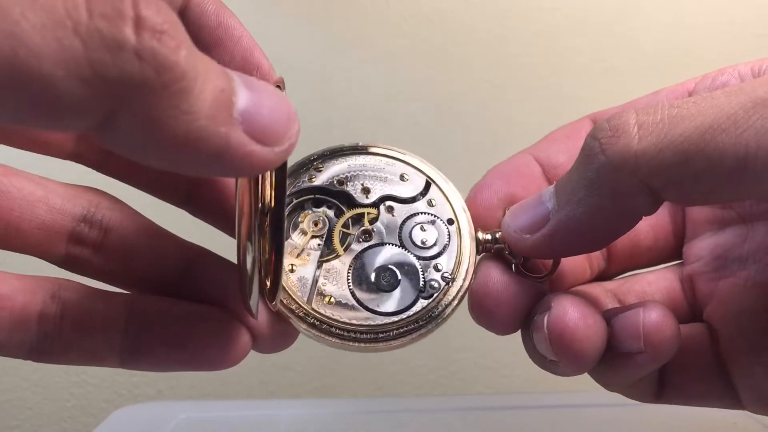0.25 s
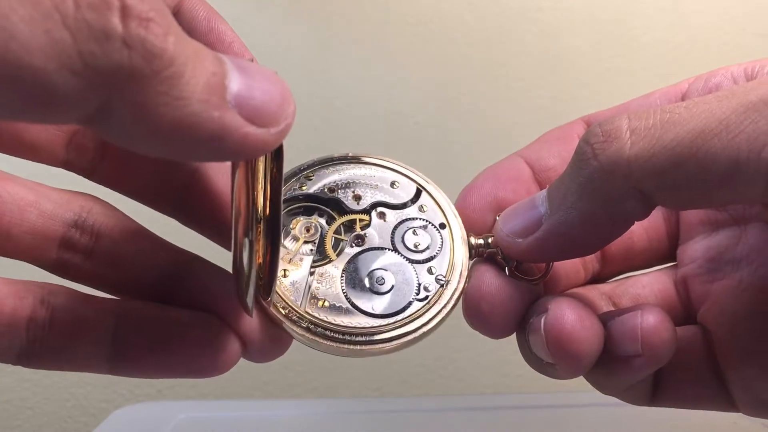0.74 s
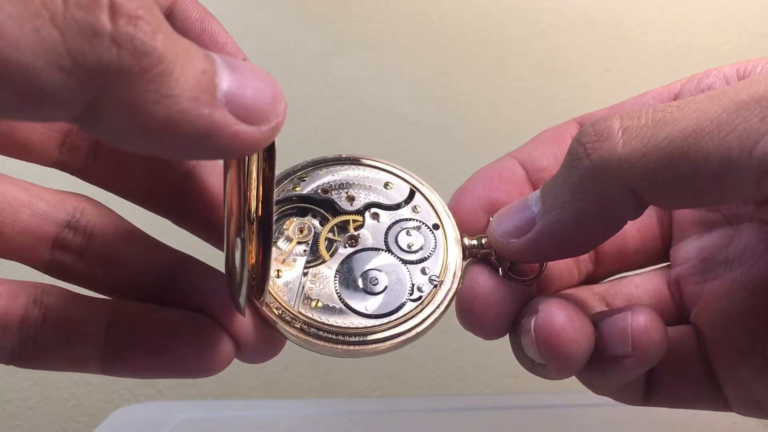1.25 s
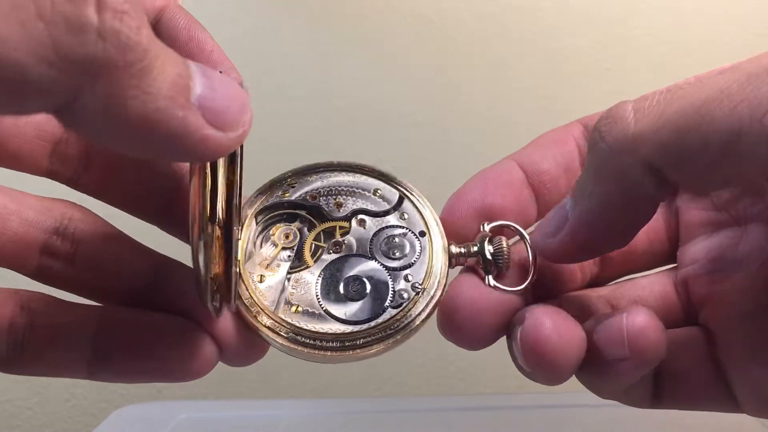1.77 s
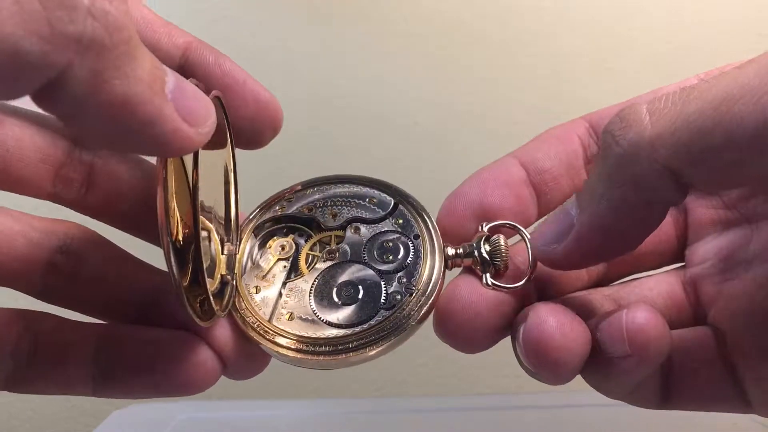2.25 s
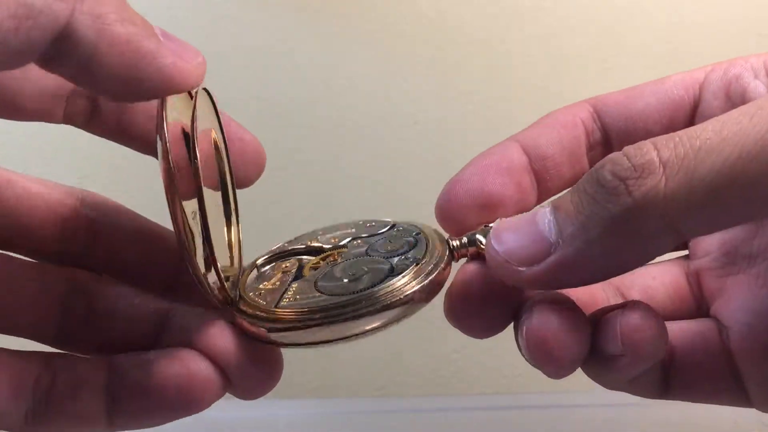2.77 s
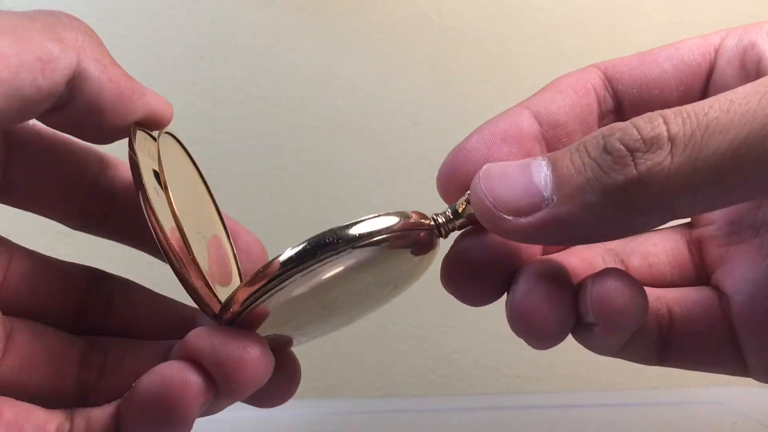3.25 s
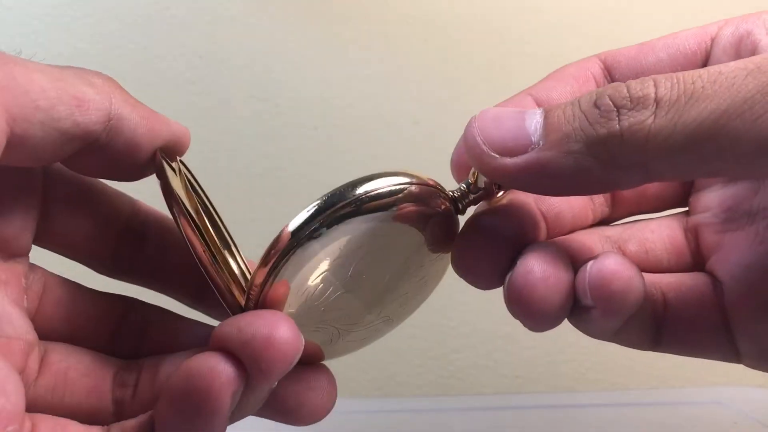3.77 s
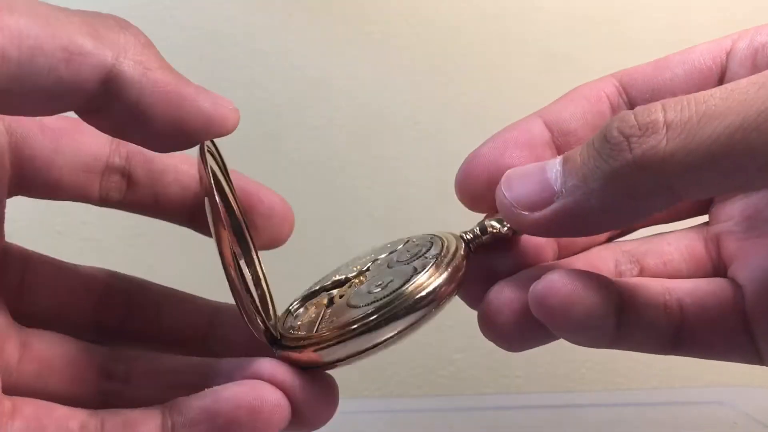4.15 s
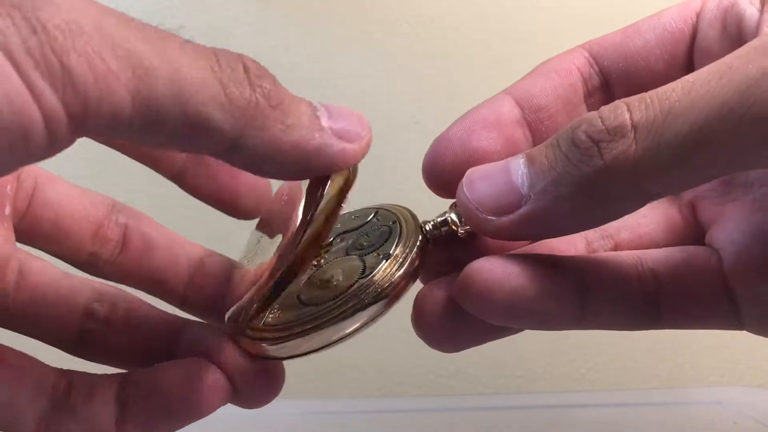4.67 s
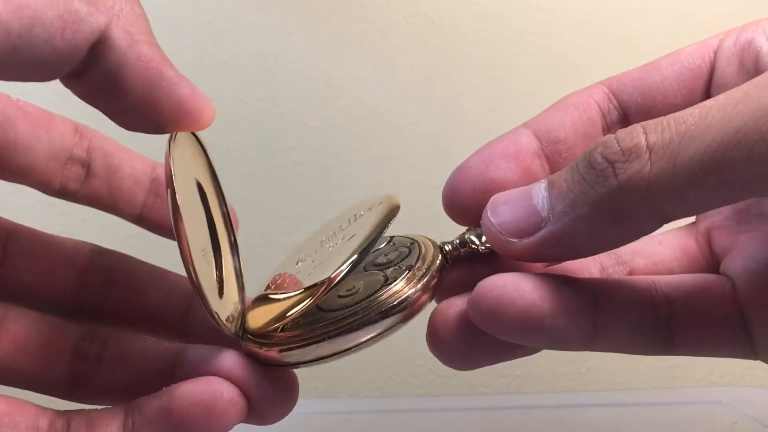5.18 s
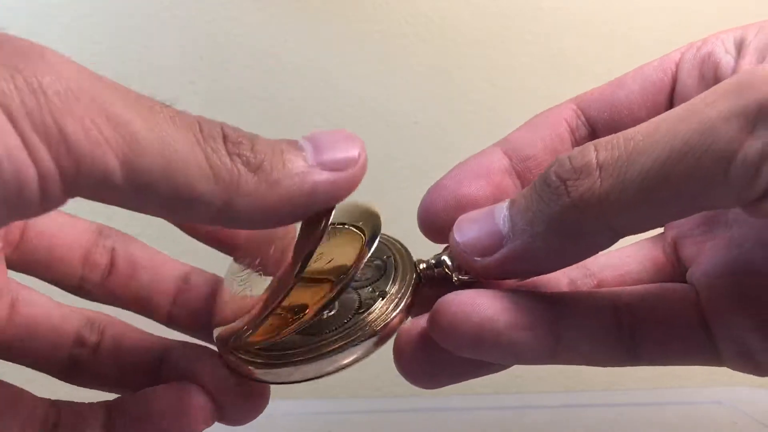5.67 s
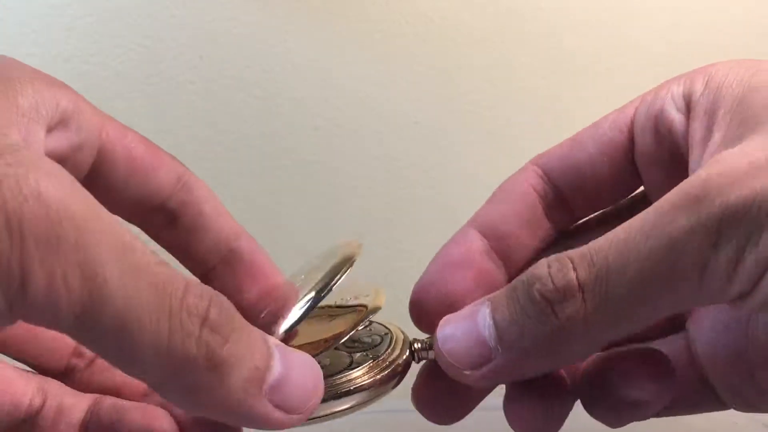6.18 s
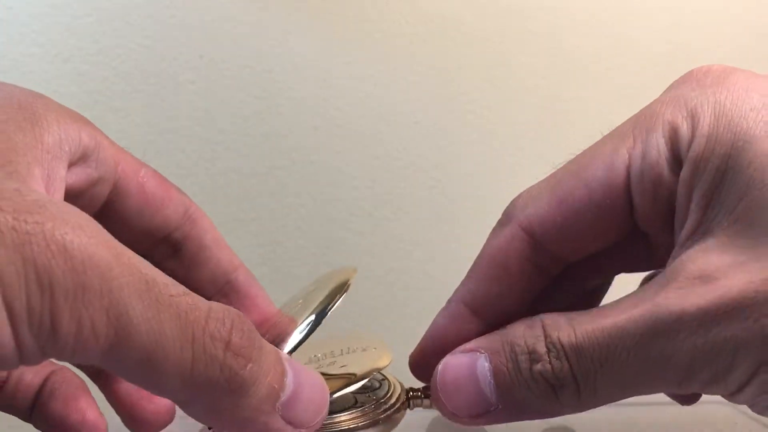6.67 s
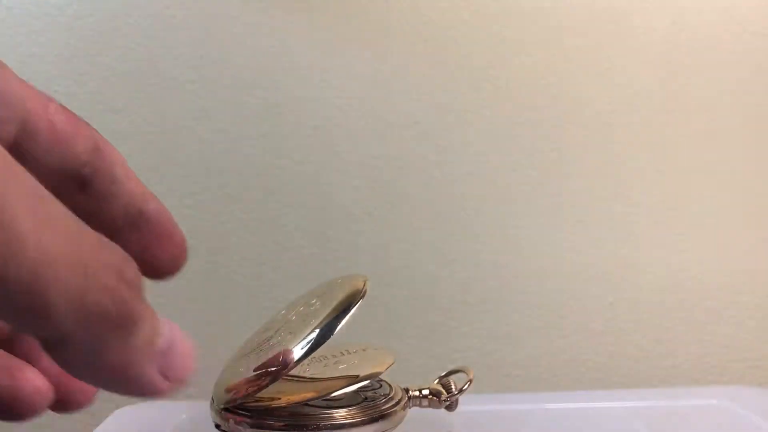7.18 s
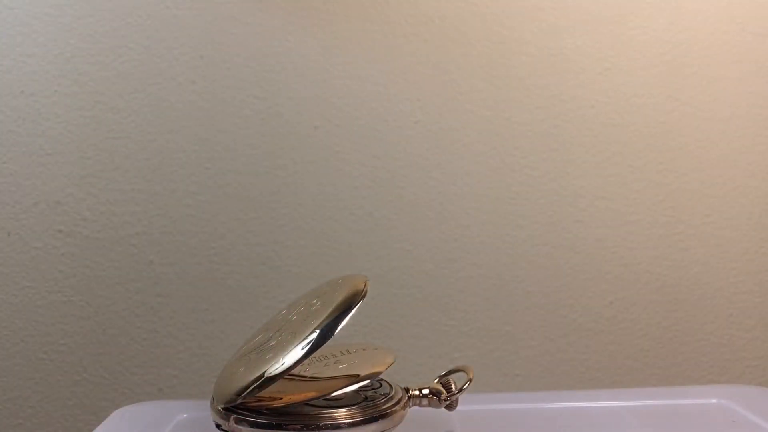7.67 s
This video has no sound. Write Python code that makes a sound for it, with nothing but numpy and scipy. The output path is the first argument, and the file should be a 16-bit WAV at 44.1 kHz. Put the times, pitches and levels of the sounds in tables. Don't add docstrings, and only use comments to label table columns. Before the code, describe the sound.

An open mechanical pocket watch ticks steadily, about five crisp high beats a second, close to a phone microphone in a small quiet room. Faint air-conditioning rumble and thin lamp buzz lie underneath. Light nail clicks come first, then a sharp metallic lid snap midway. Later hands thud and rub on a hollow plastic box, the watch lands with a loud boomy knock, and a cover drops with a small double clink.

```python
import sys
import numpy as np
from scipy import signal
from scipy.fft import rfft, irfft, next_fast_len
from scipy.io import wavfile

SR = 44100
rng = np.random.default_rng(int(sys.argv[2]) if len(sys.argv) > 2 else 0)


def pcm_store(signal):
    levels = np.round(np.clip(np.atleast_2d(signal), -1, 1) * 32767)
    wavfile.write(sys.argv[1], SR, levels.astype(np.int16).T)


def convert_level_to_amplitude(level_db):
    exponent = np.asarray(level_db, float) / 20
    return 10 ** exponent


N = 349713
SHORT, LONG = 3072, 16384


def at(s, rows):
    return np.interp(s, *np.transpose(rows))


def columns(rows):
    s, *values = np.transpose(rows)
    return [np.interp(np.arange(N) / SR, s, v) for v in values]


def rms_one(x):
    return x / np.sqrt(np.mean(x ** 2) + 1e-20)


def band(x, low_hz, high_hz):
    return signal.sosfilt(signal.butter(2, [low_hz, high_hz], "band", fs=SR, output="sos"), x)


def coloured(x, spectrum, peaks=()):
    size = next_fast_len(2 * len(x), True)
    hz = np.maximum(np.fft.rfftfreq(size, 1 / SR), 1)
    points = np.array(spectrum)
    level_db = np.interp(np.log(hz), np.log(points[:, 0]), points[:, 1])
    for centre_hz, width_hz, boost_db in peaks:
        level_db = level_db + boost_db / (1 + (2 * (hz - centre_hz) / width_hz) ** 2)
    cepstrum = irfft(np.log(convert_level_to_amplitude(level_db)), size)
    cepstrum[1:size // 2] *= 2
    cepstrum[size // 2 + 1:] = 0
    return irfft(rfft(x, size) * np.exp(rfft(cepstrum)), size)[:len(x)]


def ring(force, modes, spread_db=0):
    out = 0
    for hz, level_db, t60 in modes:
        r = convert_level_to_amplitude(-60 / (t60 * SR))
        w = 2 * np.pi * hz / SR
        gain = convert_level_to_amplitude(level_db + spread_db * rng.standard_normal())
        out = out + gain * signal.lfilter([0, np.sin(w)], [1, -2 * r * np.cos(w), r * r], force)
    return out


def burst(t60, rise_s=0.00019, size=SHORT):
    t = np.arange(size) / SR
    envelope = convert_level_to_amplitude(-60 * t / t60) * (1 - np.exp(-t / rise_s))
    return rng.standard_normal(size) * (envelope + 1e-18)


def soft_push():
    return signal.sosfilt(signal.butter(2, 600, fs=SR, output="sos"), signal.unit_impulse(LONG))


def rattle(rattle_ms):
    t = np.arange(LONG) / SR
    grains = rng.standard_normal(LONG) * rng.exponential(1, LONG) ** .5
    rise = np.clip(t / 0.00038, 0, 1)
    return grains * rise * np.clip((rattle_ms / 1000 - t) / 0.0023, 1e-18, 1)


def add(out, s, sound, peak_db):
    i = max(round(s * SR), 0)
    piece = sound[:N - i]
    out[i:i + len(piece)] += piece * convert_level_to_amplitude(peak_db) / np.max(np.abs(sound))


# frequency in Hz, level in dB, T60 in seconds.
CASE_RING = [(5900, -11, .015), (6600, -6, .015), (7080, 0, .03)]
PLATE_RING = [(8570, 15, 0.046), (8140, 21, 0.03), (9070, 9, 0.066), (9590, 6, 0.054), (9700, -19, 0.011)]
WHEEL_RING = [(12000, -6.5, 0.0071), (12100, 7, 0.017), (12150, 14, 0.024), (11970, 9, 0.025),
              (12550, -6, 0.022), (14670, 9, 0.014), (13900, -9, 0.015), (16000, -20, .012),
              (14940, -14, .012)]
UNLOCK_RING = [(3800, -9, 0.02), (4250, -9.5, 0.015), (8330, -3.5, 0.016), (9100, -5, 0.0068),
               (12960, -9, 0.0067), (13750, -9, 0.0087), (15400, -9, 0.0074)]
BRIDGE_RING = [(3620, -7, 0.1), (4180, 1, 0.09)]
# time in seconds, lead in seconds.
UNLOCK_LEAD = [(0, .0210), (4, .0205), (6.5, .0195), (7.9, .0180)]
# time in seconds, lateness in seconds.
LATENESS = [(0, 0), (1.7, -.0003), (2.0, -.0019), (2.8, -.001), (4.1, -.0013), (4.5, 0), (5.4, -.0014),
            (6.4, -.0013), (6.9, -.0005), (7.3, .0025), (7.9, .0035)]
# time in seconds, peak of the drop in dB.
FACING = [(0, -40.5), (.63, -40.5), (.83, -40), (1.5, -40.5), (2.3, -41), (2.85, -43), (3.4, -46),
          (3.63, -50), (3.83, -44.5), (4.03, -40), (4.23, -43), (4.85, -39.5), (5.03, -44.5), (5.45, -42),
          (5.83, -44.5), (6.2, -49), (6.65, -46), (7.9, -49)]
# time in seconds, case ring in dB.
CASE_LEVEL = [(0, -61), (1.7, -76), (2.2, -77), (2.7, -63), (4.3, -82), (5.3, -70), (5.7, -59.5),
              (7.0, -58), (7.5, -51), (7.9, -52.5)]
FIRST_BEAT_S, SWING_S, TOCK_AFTER_S, SWINGS = .0358, .3996, .1956, 20
STRIKE_SPREAD_DB, RING_SPREAD_DB, BEAT_SPREAD_DB = 4.5, 2.5, .4
TOCK_DB, UNLOCK_TOCK_DB, BRIDGE_TOCK_DB = 1.8, 1, -4
PLATE_DB, BRIDGE_DB = -61, -70
BRIDGE_TURNED_DB, TURN_S = -5, 3.0
UNLOCK_DB, UNLOCK_FOLLOWS = -58.5, .45
IMPULSE_SHARE = .53


def escapement():
    out = np.zeros(N)
    chance = rng.standard_normal((2 * SWINGS, 4))
    for k, (drop, plate, case, bridge) in enumerate(chance):
        tock = k % 2
        s = FIRST_BEAT_S + SWING_S * (k // 2) + TOCK_AFTER_S * tock
        s += at(s, LATENESS)
        facing_db = at(s, FACING)
        drop_db = facing_db + TOCK_DB * (tock - .5) + BEAT_SPREAD_DB * drop
        unlock_db = UNLOCK_DB + UNLOCK_FOLLOWS * (facing_db + 43.5) + UNLOCK_TOCK_DB * (tock - .5)
        plate_db = PLATE_DB + RING_SPREAD_DB * plate
        case_db = at(s, CASE_LEVEL) + RING_SPREAD_DB * case
        bridge_db = BRIDGE_DB + BRIDGE_TOCK_DB * tock + RING_SPREAD_DB * bridge
        bridge_db += BRIDGE_TURNED_DB * (s > TURN_S)
        impulse_db = unlock_db + (-3 if tock else -11)
        lead = at(s, UNLOCK_LEAD)

        blow, unlock, impulse = burst(t60=0.0094), burst(t60=0.056), burst(t60=0.0056)
        add(out, s, ring(blow, WHEEL_RING, STRIKE_SPREAD_DB), drop_db - 10)
        add(out, s, band(burst(t60=0.013), 7800, 15800), drop_db - 1.5)
        add(out, s, ring(blow, PLATE_RING, STRIKE_SPREAD_DB), plate_db + 4)
        add(out, s, ring(blow, CASE_RING, STRIKE_SPREAD_DB / 2), case_db + 5)
        add(out, s + 0.00141, ring(blow, BRIDGE_RING, STRIKE_SPREAD_DB), bridge_db + 3)
        add(out, s - lead, ring(unlock, UNLOCK_RING, STRIKE_SPREAD_DB), unlock_db + .5)
        add(out, s - lead, band(unlock, 9500, 14000), unlock_db - 8)
        add(out, s - IMPULSE_SHARE * lead, band(impulse, 8000, 15000), impulse_db)
    return out


# time in seconds, level in dB,
# lean from the low resonance (-1) to the high one (+1).
LAMP = [(0.2, -80.5, 0.85), (0.7, -81, 1), (1.3, -79.5, 1), (1.7, -79.5, .6), (2.2, -75.5, -0.51),
        (2.7, -79.5, -0.15), (3.2, -77, -0.79), (3.7, -75, -0.52), (4.2, -77, -1), (4.7, -72, .05),
        (5.2, -76.5, -0.76), (5.7, -74.5, -0.24), (6.2, -79.5, -0.11), (7.0, -83.5, -0.19),
        (7.7, -77, -0.15)]
# frequency in Hz, spread in Hz.
LAMP_MODES = [(7340, 65), (7500, 30), (7665, 62)]
# frequency in Hz, spread in Hz, level in dB.
LAMP_FAINT = [(5400, 80, -91), (6100, 160, -86.5), (6780, 30, -88), (7080, 30, -89), (7740, 30, -86),
              (7900, 70, -85), (10140, 90, -93), (12400, 150, -93), (14700, 120, -92)]
MAINS_HZ, FIRST_KICK, SECOND_KICK = 59.983, .40, .92
LAMP_FOCUS_DB, LAMP_MIDDLE_DB = 5.5, -3
SHADE_DB = -1


def lamp():
    order = np.arange(80, 255)[:, None]
    cycle = np.linspace(0, 1, 8192)
    harmonics = sum(np.cos(2 * np.pi * order * (cycle - kick)) for kick in (FIRST_KICK, SECOND_KICK))
    phase = np.arange(N) / SR * MAINS_HZ % 1
    level_db, lean = columns(LAMP)
    resonances = []
    for (hz, spread_hz), place in zip(LAMP_MODES, (-1, 0, 1)):
        focus_loss_db = LAMP_FOCUS_DB * (place - lean) ** 2
        resonances.append((hz, spread_hz, level_db + 5 + LAMP_MIDDLE_DB * (place == 0) - focus_loss_db))
    for hz, spread_hz, db in LAMP_FAINT:
        resonances.append((hz, spread_hz, db + SHADE_DB * lean * (hz < 7000)))
    out = 0
    for hz, spread_hz, db in resonances:
        bell = np.exp(-.5 * ((order * MAINS_HZ - hz) / spread_hz) ** 2)
        wave = rms_one((bell * harmonics).sum(axis=0))
        out = out + convert_level_to_amplitude(db) * np.interp(phase, cycle, wave)
    return out


# frequency in Hz, density in dB per Hz.
AIR = [(30, 2), (60, 2), (135, -3.5), (223, -10.5), (432, -20), (1570, -25.5), (1840, -30.5), (2670, -31.5),
       (4900, -35), (7400, -30), (10400, -40.5), (14800, -36), (15750, -45), (15950, -68)]
# frequency in Hz, width in Hz, boost in dB.
AIR_PEAKS = [(56.1, 21, 11), (133.3, 13, 6.5), (215, 17.2, 9.5), (2197, 640, 9), (3380, 130, 7.5),
             (9450, 240, 4), (12400, 500, 3)]
# time in seconds, level in dB.
SURGE = [(0, -63), (.35, -62.5), (.75, -65), (1.5, -65.5), (3.1, -59), (3.73, -65), (3.9, -67.5),
         (5.08, -71), (5.4, -61), (5.67, -59.5), (5.96, -67), (6.5, -60), (7.0, -63.5), (7.6, -62)]
RUMBLE_DB, HISS_DB = -59.5, -69


def air():
    noise = coloured(rng.standard_normal(N), AIR, AIR_PEAKS)
    deep = signal.sosfiltfilt(signal.butter(2, 90, fs=SR, output="sos"), noise)
    low = signal.sosfiltfilt(signal.butter(2, 450, fs=SR, output="sos"), noise)
    deep_db, = columns(SURGE)
    throb = convert_level_to_amplitude(deep_db + 1.5) * rms_one(deep)
    return throb + convert_level_to_amplitude(RUMBLE_DB) * rms_one(low - deep) + convert_level_to_amplitude(HISS_DB) * rms_one(noise - low)


# start in seconds, peak in dB, note in Hz, knock and crack in dB re the peak.
TAPS = [
    (1.733, -49, 1280, 8, 0),
    (2.8667, -55.5, 1230, -9, -13),
    (3.031, -55, 1210, -6, -13),
    (3.5132, -55, 1910, -6, -5),
    (5.9739, -37, 1380, -6, -12),
    (6.24, -52, 2250, -5, -6),
    (6.5294, -60, 2040, 2, 8),
]


def nail_taps():
    out = np.zeros(N)
    for s, db, hz, knock_db, crack_db in TAPS:
        note = ring(burst(t60=0.003, rise_s=0.00039), [(hz, 0, .009), (1.25 * hz, -9, .006)])
        add(out, s, band(note, 0.81 * hz, 2.0 * hz), db + 2.5)
        add(out, s, band(burst(t60=0.037), 2200, 4900), db + knock_db - 0.5)
        add(out, s, band(burst(t60=0.016), 6000, 16000), db + crack_db - 2.5)
    return out


# start in seconds, peak in dB, rattle length in milliseconds.
SNAP = [
    (4.0465, -16.5, 6.9),
]
# frequency in Hz, level in dB, T60 in seconds.
LID = [(2263, -0.5, 0.067), (3000, -21, .015), (4740, -9, .06), (4770, -4, 0.057), (5150, -15, 0.062),
       (5220, -22, .16), (8060, -6.5, 0.034), (8320, -3, 0.055), (8700, -25, .03), (9500, -20, .03),
       (11200, -8, .04), (11200, -20, .035), (12850, -19, .03), (14050, -18, .03)]
# frequency in Hz, density in dB per Hz.
SNAP_COLOUR = [(350, -51), (600, -30), (1630, -27), (2210, -5), (3400, -21), (4540, -10), (5910, -17.5),
               (7700, -8), (10300, -23), (11300, -5.5), (16500, -17.5)]


def lid_snap():
    out = np.zeros(N)
    for s, db, rattle_ms in SNAP:
        contact = rattle(rattle_ms)
        add(out, s, coloured(contact, SNAP_COLOUR), db - 3)
        add(out, s, np.gradient(ring(contact, LID)), db - 12)
        shimmer = coloured(burst(t60=0.069, rise_s=.002, size=LONG), SNAP_COLOUR)
        add(out, s + 0.0018, shimmer, db - 16)
        wash = band(burst(t60=.3, rise_s=.004, size=LONG), 4450, 5500)
        add(out, s + .004, wash, db - 37)
    return out


# start in seconds, peak in dB, frequency in Hz, T60 in seconds.
THUDS = [
    (4.235, -53.5, 318, 0.24),
    (6.17, -44, 368, 0.029),
    (6.195, -43, 350, 0.024),
    (6.236, -46, 210, 0.076),
    (6.279, -48, 233, 0.049),
    (6.341, -47, 350, 0.077),
    (6.415, -49, 235, 0.069),
    (6.878, -38, 215, 0.041),
    (6.946, -44, 207, 0.027),
    (6.975, -39, 205, 0.055),
]


def box_thuds():
    out = np.zeros(N)
    push = soft_push()
    for s, db, hz, t60 in THUDS:
        add(out, s, ring(push, [(hz, 0, t60), (1.6 * hz, -8, 0.6 * t60)]), db - .5)
    return out


# start in seconds, rub in dB, rustle in dB, hold in seconds.
SHUFFLE = [(4.458, -77, -84, .01), (4.62, -67, -82, .003), (4.685, -61.5, -68, .005),
           (6.175, -54, -65, .005), (6.223, -86, -66.5, .05), (6.34, -61, -71, 0.063),
           (6.42, -68, -71, .08), (6.566, -53.5, -62, 0.011), (6.7, -59.5, -70, 0.088),
           (6.889, -52.5, -80, .003), (6.97, -53.5, -82, .01), (7.076, -67.5, -67, .08),
           (7.18, -65, -74, 0.11)]
RUB_RISE_DB_PER_S, RUB_FALL_DB_PER_S = 352, 330


def shuffle():
    out = np.zeros(N)
    rub = rms_one(band(rng.standard_normal(N), 260, 480))
    grains = rng.standard_normal(N) * rng.exponential(1, N)
    rustle = rms_one(band(grains, 1230, 2100))
    t = np.arange(N) / SR
    for s, rub_db, rustle_db, hold_s in SHUFFLE:
        near = slice(int((s - .2) * SR), int((s + hold_s + .2) * SR))
        before_s = np.maximum(s - t[near], 0)
        after_s = np.maximum(t[near] - s - hold_s, 0)
        swell = convert_level_to_amplitude(-RUB_RISE_DB_PER_S * before_s - RUB_FALL_DB_PER_S * after_s)
        out[near] += swell * (convert_level_to_amplitude(rub_db - 5) * rub[near] + convert_level_to_amplitude(rustle_db - 8.5) * rustle[near])
    return out


# start in seconds, peak in dB.
SET_DOWN = [
    (6.575, -8.5),
]
# frequency in Hz, level in dB, T60 in seconds.
BOX = [(70, -6.5, 0.12), (151, -8, 0.1), (202, -0.5, 0.1), (247, 2, 0.034), (350, -2.5, 0.031),
       (438, 0.5, 0.03), (516, -10.5, .05), (747, -9, 0.046), (1440, -38, 0.027)]
# frequency in Hz, density in dB per Hz.
CRACK_COLOUR = [(500, -21), (800, -16), (1300, -10.5), (2290, -24), (3850, -14), (6000, -18), (9220, -25.5),
                (11100, -23), (12600, -34), (15500, -31), (16500, -38)]
ROCK_S, ROCK_DB = 0.003055, 1
BOOM_LAG_S = 0.0116


def set_down():
    out = np.zeros(N)
    (s, db), = SET_DOWN
    add(out, s + 0.00141, coloured(burst(t60=0.008), CRACK_COLOUR), db - 9.5)
    push = soft_push()
    push = push + convert_level_to_amplitude(ROCK_DB) * np.roll(push, round(ROCK_S * SR))
    walls = ring(push, BOX[1:])
    cavity = np.roll(ring(push, BOX[:1]), round(BOOM_LAG_S * SR))
    add(out, s + 0.00196, band(walls + cavity, 81, 1000), db - 1.5)
    add(out, s + .003, band(burst(t60=0.066, size=LONG), 110, 770), db - 9)
    return out


# start in seconds, peak in dB, rattle length in milliseconds.
COVER_DROPS = [
    (7.3484, -36.5, 8.5),
    (7.3625, -37.5, 8.2),
]
# frequency in Hz, level in dB, T60 in seconds.
COVER = [(990, -9, 0.028), (1870, -21, .06), (2086, 9, 0.028), (4400, -11, 0.025), (6440, -14, 0.026),
         (7460, -11, .03)]
# frequency in Hz, density in dB per Hz.
COVER_COLOUR = [(290, -59), (500, -22.5), (1730, -10), (2010, -4.5), (2650, -24), (4290, -17.5),
                (11300, -31.5), (15300, -40), (16500, -54)]


def cover_drops():
    out = np.zeros(N)
    for s, db, rattle_ms in COVER_DROPS:
        add(out, s - .002, ring(rattle(rattle_ms), COVER, spread_db=1), db - 2)
        shimmer = coloured(burst(t60=0.3, rise_s=0.0014, size=LONG), COVER_COLOUR)
        add(out, s - .002, shimmer, db - 7)
    return out


ROOM_T60_S, ROOM_DB, ROOM_CUT_HZ = 0.29, -18.5, 6800


def room(x):
    tail = burst(ROOM_T60_S, rise_s=0.0011, size=LONG)
    tail = signal.sosfilt(signal.butter(1, ROOM_CUT_HZ, fs=SR, output="sos"), tail)
    tail = tail / np.sqrt(np.sum(tail ** 2))
    return x + convert_level_to_amplitude(ROOM_DB) * signal.fftconvolve(x, tail)[:N]


def scene():
    handling = nail_taps() + lid_snap() + box_thuds() + shuffle() + set_down() + cover_drops()
    return (room(escapement() + handling) + lamp() + air())[None]


def roll_off(x):
    return signal.sosfilt(signal.butter(12, 16660, fs=SR, output="sos"), x)


MIC_LOW_HZ, CUTOFF_HZ = 45.6, 16600
OVERLOAD = .42


def record(dry):
    x = signal.sosfilt(signal.butter(4, MIC_LOW_HZ, "high", fs=SR, output="sos"), dry)
    x = OVERLOAD * np.tanh(x / OVERLOAD)
    x = signal.sosfilt(signal.cheby2(12, 60, CUTOFF_HZ, fs=SR, output="sos"), x)
    return roll_off(x)


dry = scene()
out = record(dry)
pcm_store(out)
```